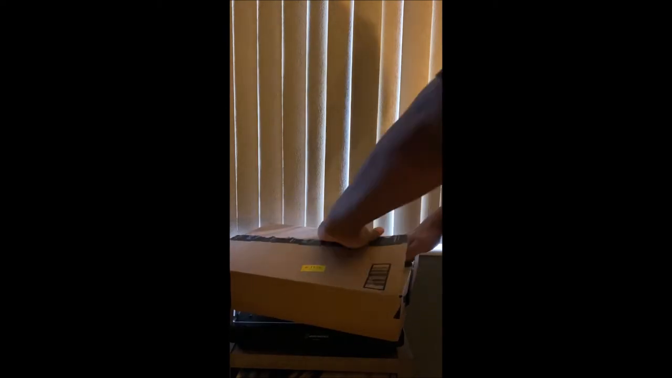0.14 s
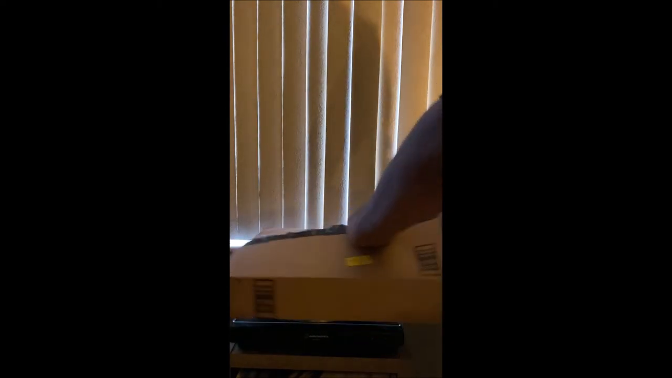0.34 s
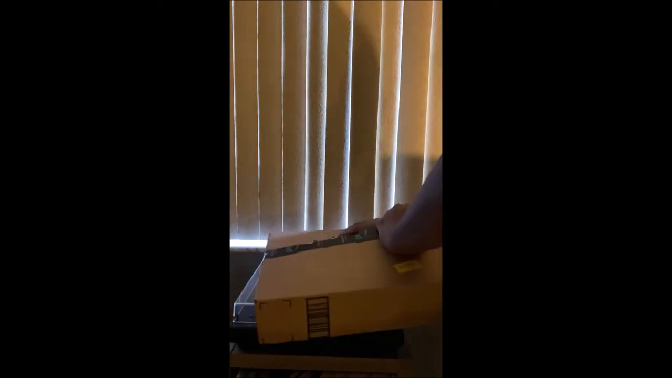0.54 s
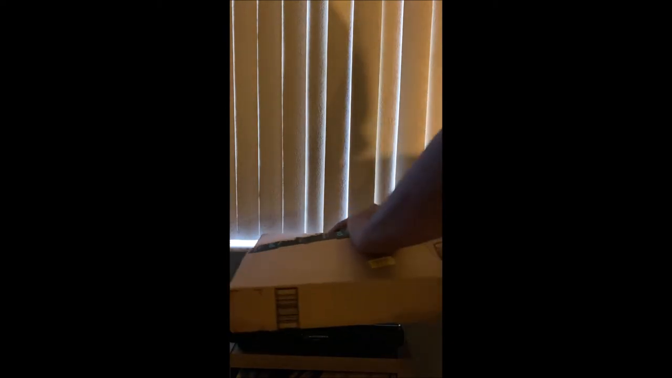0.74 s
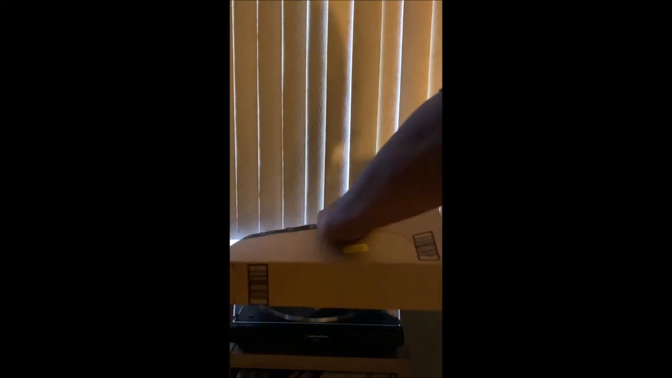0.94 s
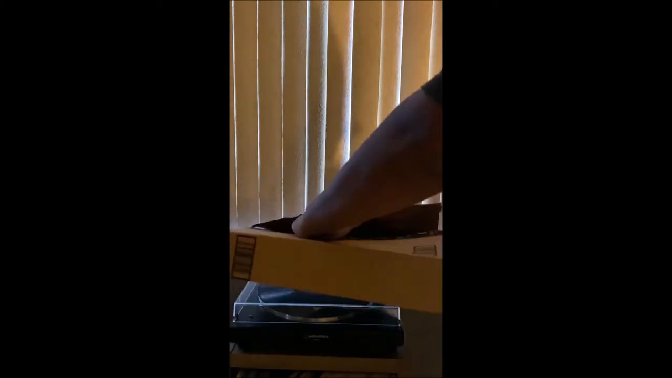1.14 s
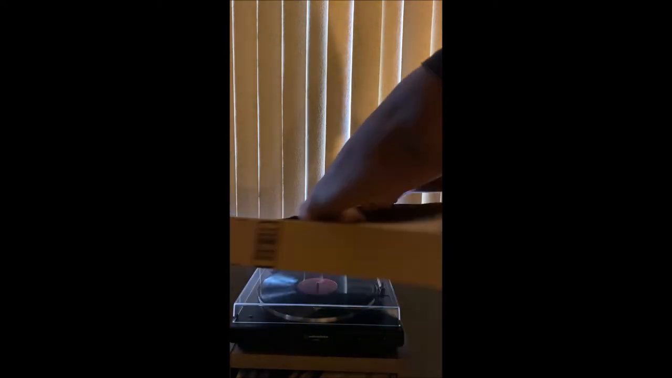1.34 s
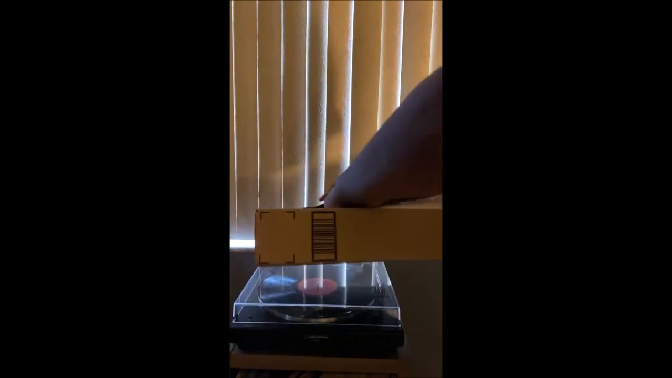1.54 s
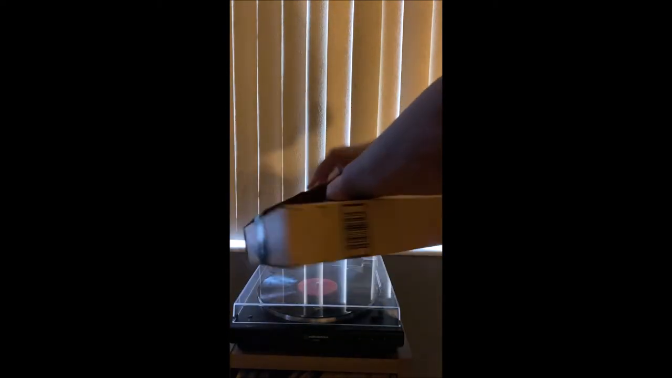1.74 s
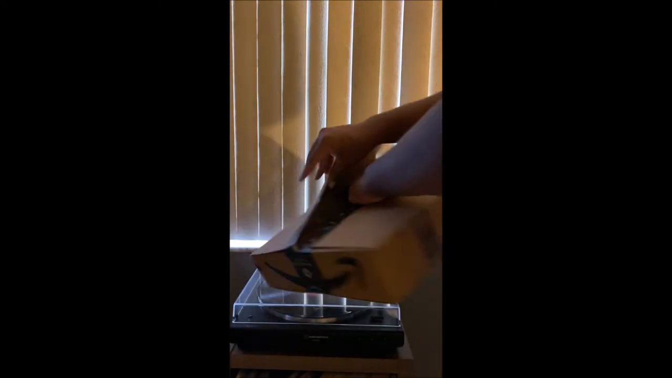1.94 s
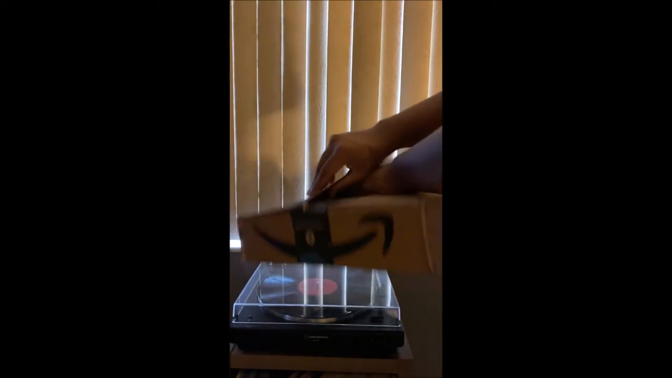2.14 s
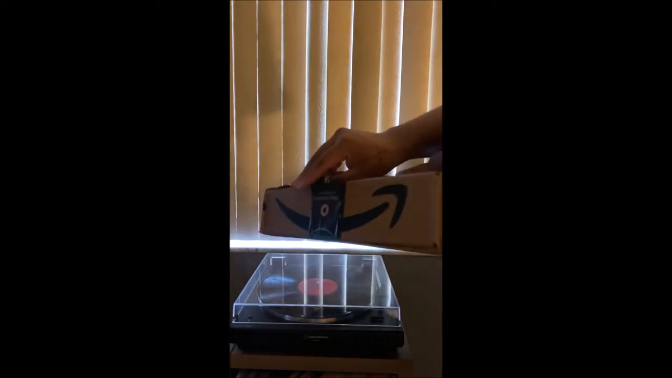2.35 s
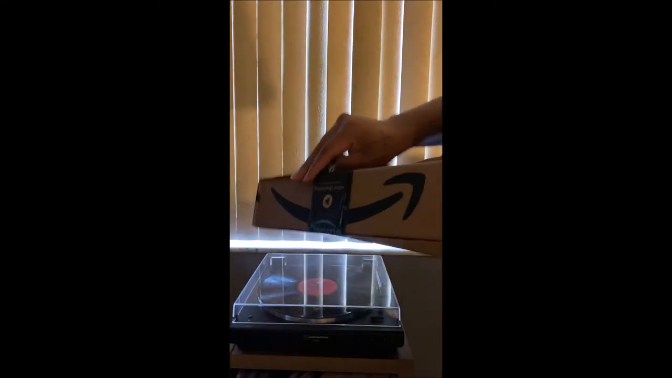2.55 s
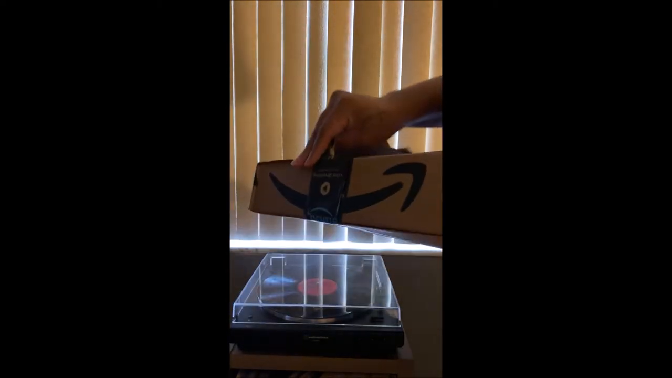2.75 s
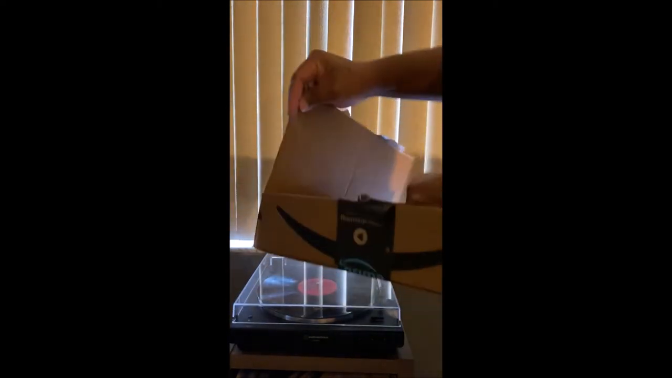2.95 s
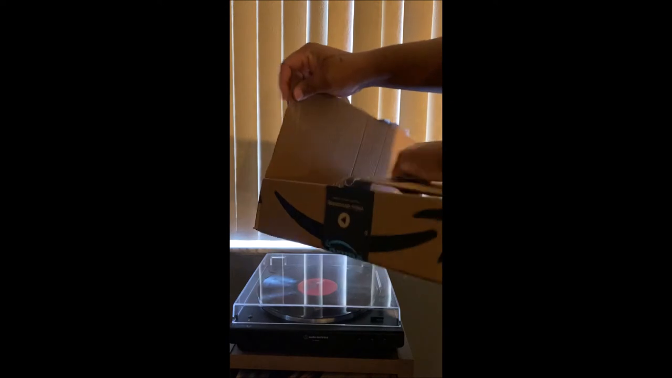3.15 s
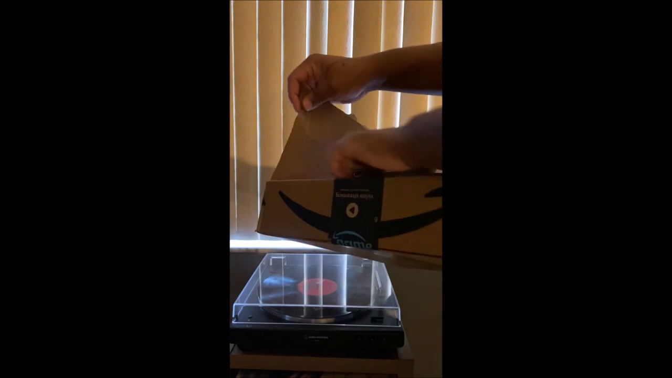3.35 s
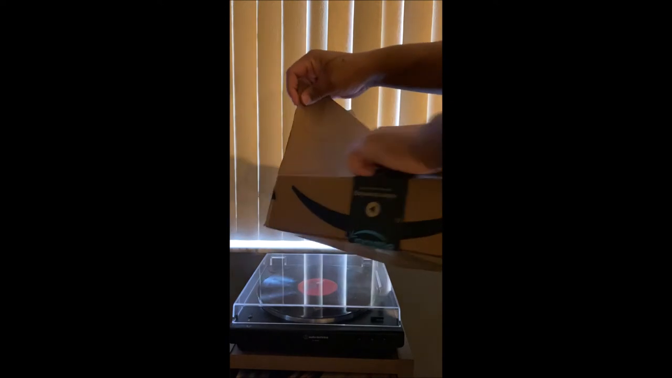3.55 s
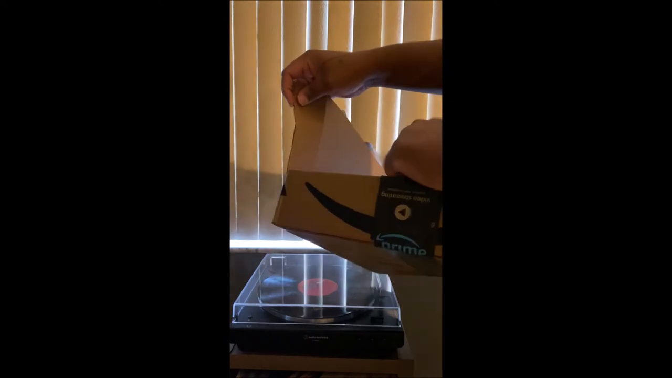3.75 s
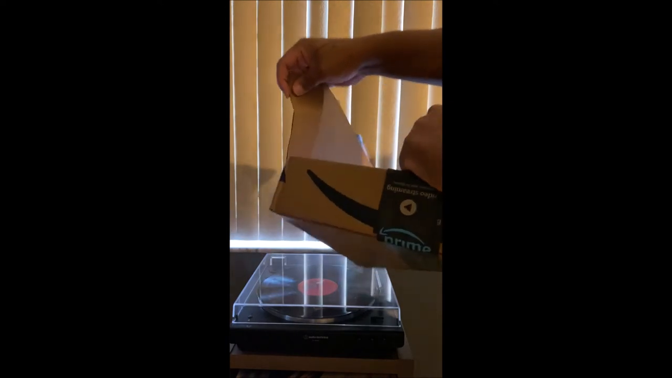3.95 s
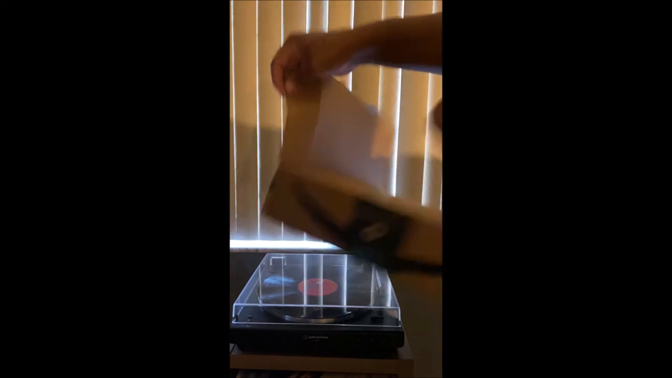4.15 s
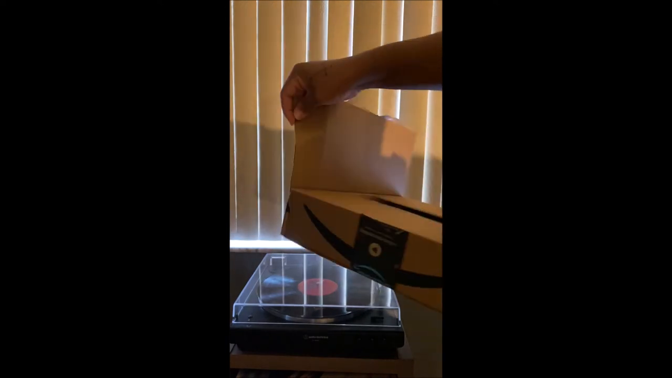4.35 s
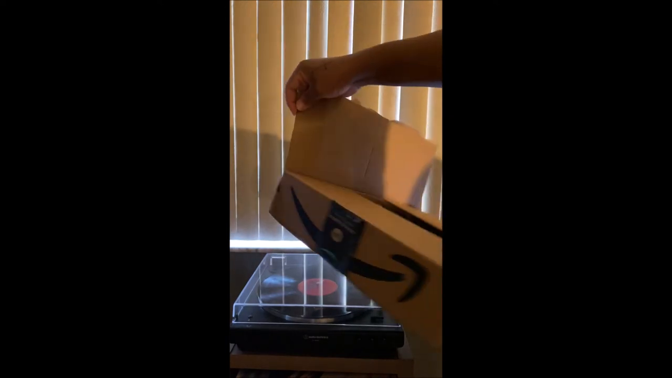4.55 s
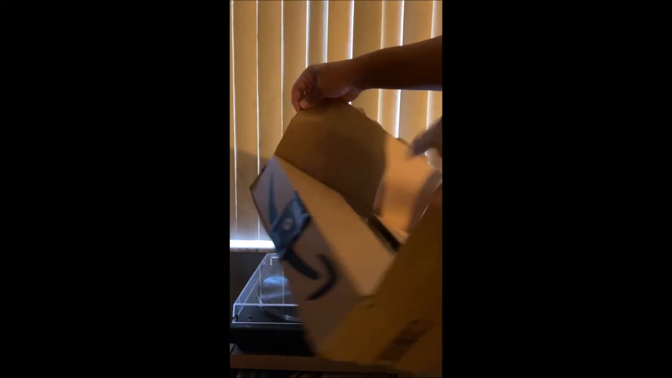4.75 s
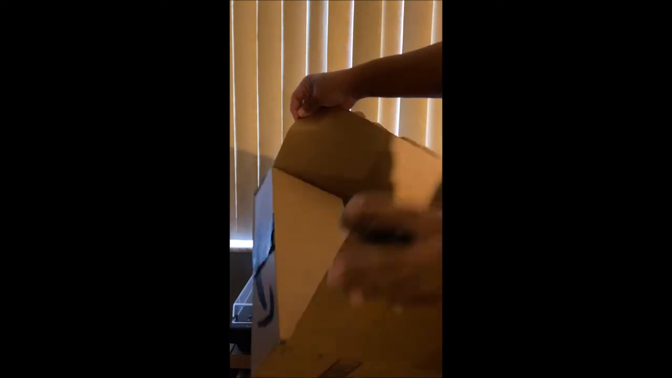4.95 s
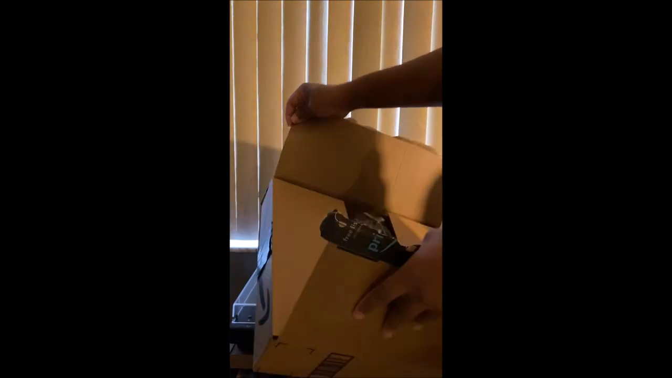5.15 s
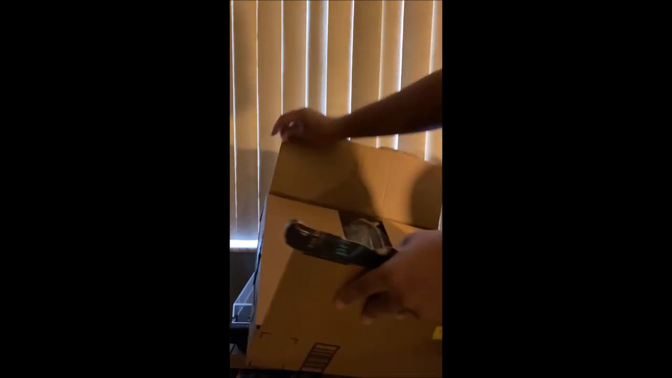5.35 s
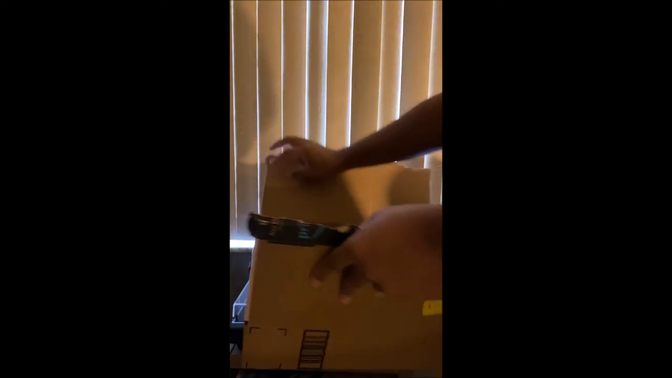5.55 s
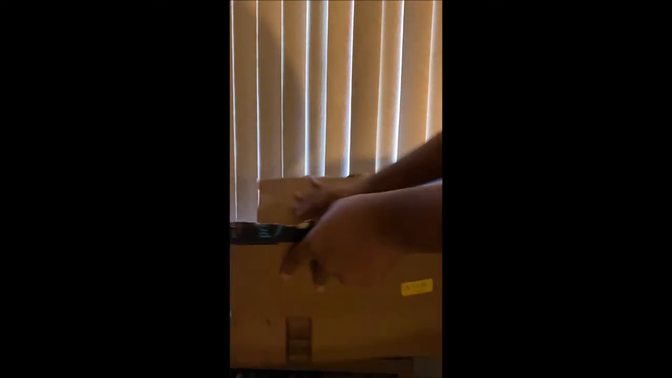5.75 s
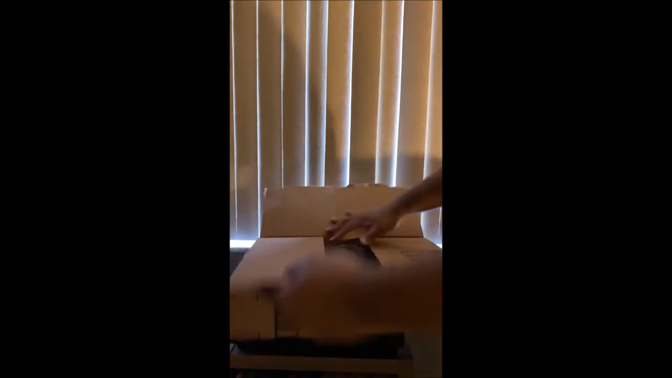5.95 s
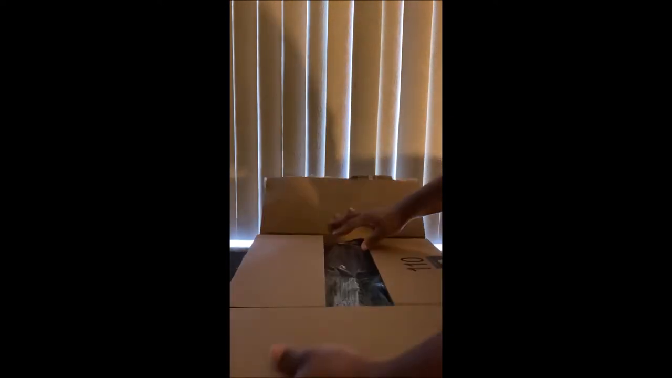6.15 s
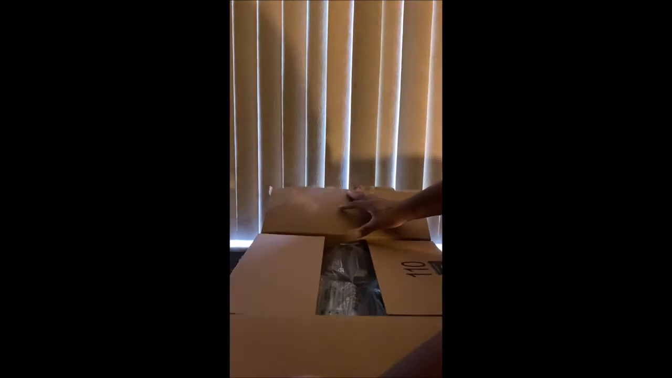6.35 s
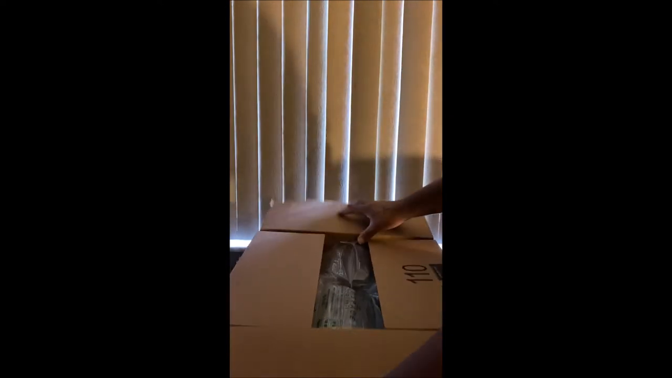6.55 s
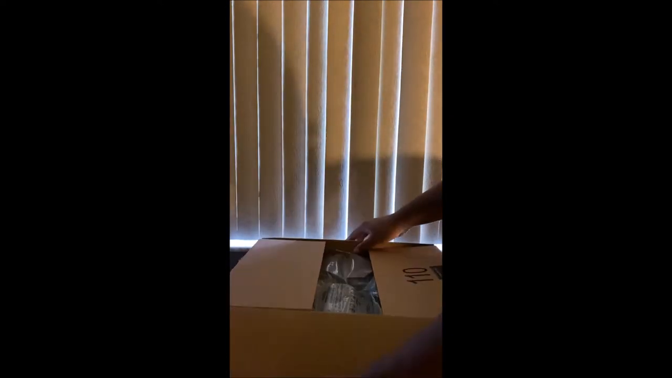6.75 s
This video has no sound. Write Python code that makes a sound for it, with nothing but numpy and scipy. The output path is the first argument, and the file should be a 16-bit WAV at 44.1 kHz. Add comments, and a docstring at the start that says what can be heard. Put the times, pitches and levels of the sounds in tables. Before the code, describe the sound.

A quiet, low room hum sits under close, dry cardboard handling. From 0 to 1.3 s hands brush and rasp over card, with soft hollow palm bumps near 0.5, 0.75 and 1.2 s and a brief scrape. A hard, loud clack with a boxy thump lands at 1.37 s, then lighter sliding, clicks and muffled bumps continue to 2.5 s. At 2.75 and 2.9 s flaps tear with sharp cracks, crunching fluting and hollow booms, plus a weaker snap just before 3 s. Rustling and small clicks follow. Another crunchy snap comes at 3.84 s, a brighter one at 4.17 s, and a deep boxy knock at 4.38 s. Scrapes and a woody clack occur around 4.9-5.05 s, bumps and a scrape near 5.8 s, then softer papery sliding, light taps and a final bump near 6.83 s. Room reflections are short.

```python
"""Cardboard box pulled open

A cardboard shipping box is turned in the hands and opened in a small room, over a low hum.
Noise friction makes the sliding; damped sines and noise bursts make clicks, bumps and knocks.
Five snaps tear flaps loose: crack, fluting crunch, panel clack, flap ring and the boom of box modes.
Two closely spaced microphone ports pick it up, differing in phase and sensitivity."""
import sys
import numpy as np
from scipy import signal
from scipy.fft import rfft, irfft, next_fast_len
from scipy.io import wavfile
from scipy.ndimage import uniform_filter1d

SR = 44100
rng = np.random.default_rng(int(sys.argv[2]) if len(sys.argv) > 2 else 0)


def inscribe(sig):
    """Save sig as 16-bit PCM at rate SR to the path in sys.argv[1].

    A 1-D sig is mono; a 2-D sig holds one channel per row.
    Samples are clipped to [-1, 1] before scaling.
    """
    pcm = np.round(np.clip(np.atleast_2d(sig).T, -1, 1) * 32767)
    wavfile.write(sys.argv[1], SR, pcm.astype(np.int16))


N = 304113
AGE_S = np.arange(SR // 4) / SR   # time since a contact

# Table levels are relative; the functions add fixed trims.
# room hum spectrum: (frequency [Hz], density [dB per Hz])
HUM_SPECTRUM = [(20, -3.5), (36, -43), (48, 6), (58, 11), (72, -6.5), (115, -2.5), (160, -3), (400, -20),
                (1500, -38.5), (15000, -62)]
HUM_DB = -43.5   # rms
# left-right likeness of diffuse sound: (frequency [Hz], correlation [-1..1])
LIKENESS = [(150, .984), (300, .8), (600, .4), (1500, .3), (3500, .35), (7000, .8), (14000, .9)]
# nearby surfaces: (delay [s], level [dB], left over right [dB])
ECHOES = [(.0058, -18, -5), (.0108, -19, 5), (.0155, -15, 4), (.0231, -19, -5)]
# room tail spectrum: (frequency [Hz], level [dB])
TAIL_SPECTRUM = [(80, 1.5), (300, -12), (700, -3), (1200, -4), (2200, 0), (5000, 0), (10000, -5),
                 (16000, -8)]
# tail band edges: (frequency [Hz])
TAIL_EDGES_HZ = [900, 1120, 1420, 1800, 2300, 3000, 4100, 5600, 8000, 12000, 17000]
ROOM_T60_S = 0.24
# phase lag of the right port behind the left: (frequency [Hz], lag [rad])
PORT_PHASE = [(0, 0), (150, -.05), (350, -.25), (700, -.55), (1200, -.35), (1800, 0), (3000, .9),
              (4400, .8), (5000, .15), (7300, 3.14), (10400, 6.28), (13500, 9.42), (16500, 12.4)]
# sensitivity of the left port over the right: (frequency [Hz], level [dB])
PORT_BALANCE = [(200, .1), (1000, -.8), (2300, -1.2), (6000, 0)]
CUTOFF_HZ = 16200

# wall rumble under sliding: (frequency [Hz], density [dB per Hz])
RUMBLE_SPECTRUM = [(40, -10), (100, 5.5), (200, -1), (330, 5), (500, 2.5), (800, -8), (1400, -47),
                   (3000, -65)]
# grainy rasp: (frequency [Hz], density [dB per Hz])
RASP_SPECTRUM = [(300, -9), (700, 8.5), (1200, 5.5), (2000, 3.5), (3200, -1), (4200, -1), (5600, 0),
                 (7000, -13.5), (12000, -3.5)]
# paper-face hiss: (frequency [Hz], density [dB per Hz])
HISS_SPECTRUM = [(1500, -1.5), (4000, 0), (5700, -3), (8000, -3.5), (10000, 2.5), (12500, 4), (15600, 2.5),
                 (16200, -27)]
# hand strokes over card: (start [s], length [s], rasp level [dB], hiss over rasp [dB])
STROKES = [(0.028, 0.15, -58.5, 12.5), (0.214, 0.15, -48, -4), (0.36, 0.33, -52, 4.5),
           (0.69, 0.14, -42.5, -9), (0.792, 0.22, -46, 0), (0.991, 0.25, -46.5, 2.5), (1.237, 0.24, -44, 1),
           (1.422, 0.25, -50.5, 2.5), (1.734, 0.14, -49.5, 0), (2.05, 0.26, -60.5, 19.5),
           (2.197, 0.24, -48.5, 13), (2.492, 0.74, -49.5, -10), (2.857, 0.15, -38.5, -3),
           (3.064, 0.014, -47, 13), (3.177, 0.14, -49, 5.5), (3.252, 0.32, -46, 0.5), (3.54, 0.2, -48, 2.5),
           (3.713, 0.32, -51, -7), (4.093, 0.3, -41, -23), (4.568, 0.12, -66, 17),
           (4.684, 0.43, -44.5, -7.5), (5.16, 0.11, -52.5, 6.5), (5.258, 0.21, -49.5, -3),
           (5.39, 0.37, -47, 0.5), (5.607, 0.62, -50.5, 3), (6.202, 0.28, -54, 12.5),
           (6.6, 0.1, -50.5, -13), (6.74, 0.17, -45.5, -13)]
SPEED_POWER = 0.74   # friction amplitude against hand speed
HISS_SPEED_POWER = 0.63   # extra power of speed for hiss
WALL_RUMBLE_DB = 1   # against the rasp gain
# firmness of the holding hand: (time [s], level [dB])
HOLD = [(0, -16), (.035, -17), (.07, -2), (6.1, -1.5), (6.53, -7.5), (6.7, 0)]
CREEP_RUMBLE_DB, CREEP_RASP_DB, CREEP_HISS_DB = -48.5, -51.5, -53.5   # gains at a 0 dB hold
CRACKLE_DB, CRACKLES_PER_S = -14, 120   # catching fibres against the rasp

# an edge scrapes over card: (start [s], length [s], level [dB], pitch [Hz])
SCRAPES = [(0.052, 0.13, -50, 1770), (0.526, 0.04, -47, 2600), (.746, 0.031, -37.5, 1110),
           (1.748, 0.05, -53, 1820), (3.331, 0.054, -45, 1250), (3.403, .035, -42.5, 1260),
           (3.608, 0.039, -45, 2170), (4.888, 0.034, -46, 2080), (4.935, .04, -44, 1950),
           (5.77, 0.045, -39.5, 1500), (5.866, 0.06, -50.5, 1180), (5.916, 0.28, -51, 4770),
           (6.606, 0.12, -49, 950), (6.804, .05, -42, 1140), (2.882, 0.016, -31, 2400),
           (4.159, 0.031, -32, 1400), (5.001, 0.024, -44, 2000)]
# short pitched card clicks, alone or within knocks and snaps: (time [s], level [dB], pitch [Hz])
CLICKS = [(0.209, -42, 1250), (0.276, -46, 1900), (.478, -42, 1900), (1.199, -35, 1090),
          (1.3727, -13.5, 1250), (1.376, -28, 2300), (1.386, -19, 970), (1.399, -26, 1970),
          (1.567, -41, 1390), (1.788, -35, 1690), (2.1, -30, 1950), (2.263, -29.5, 2220), (2.27, -33, 1350),
          (2.747, -18, 1520), (3.068, -29.5, 1820), (3.248, -32, 2210), (3.267, -31, 1180),
          (3.332, -31, 1280), (3.362, -37, 2040), (3.411, -40, 1150), (3.428, -39, 1440), (3.481, -31, 686),
          (3.748, -33, 1990), (3.8364, -12.5, 1660), (3.847, -32, 1580), (3.861, -28, 2450),
          (4.184, -27, 1430), (4.202, -23, 2050), (4.376, -21, 1190), (5.233, -25.5, 1300),
          (5.591, -28.5, 950), (5.594, -31, 1890), (5.65, -31, 1300), (6.154, -35.5, 1220),
          (6.222, -36, 1220), (6.838, -36, 1900)]
CLICK_Q, CLICK_PEAK_S = 5.7, 0.0026
# single fibres break under the pull: (time [s], level [dB])
TICKS = [(0.7052, -18.5), (0.926, -30), (2.0365, -42), (2.515, -53), (2.562, -40), (2.8664, -43),
         (3.942, -32), (4.025, -36), (4.1114, -35), (4.166, -23), (4.183, -18), (4.2982, -45), (4.862, -37),
         (4.924, -37)]
# the whole box sways in the grip: (time [s], level [dB], pitch [Hz])
SWAYS = [(0.353, -35, 56.8), (1.375, -24.5, 107), (2.903, -24, 93), (3.225, -33, 66), (3.443, -38, 74),
         (4.185, -29, 94.5), (4.873, -28, 84.5), (5.87, -28.5, 113), (6.863, -32, 63)]

# a soft palm bumps a wall: (time [s], wall thump [dB], wall pitch [Hz], panel clack [dB])
BUMPS = [(0.472, -21.5, 228, -58), (0.487, -38, 231, -58), (0.504, -30, 250, -58),
         (.751, -17.5, 294, -24.5), (.766, -22.5, 242, -38), (0.782, -23.5, 195, -56),
         (.797, -27, 225, -53), (1.168, -23.5, 313, -33), (1.676, -29, 316, -37), (1.8392, -30, 320, -33.5),
         (1.95, -33.5, 323, -40), (2.112, -34.5, 207, -40), (2.515, -26.5, 192, -28.5),
         (3.183, -33, 370, -55), (3.25, -30, 400, -51), (3.304, -26, 207, -24), (4.265, -22, 300, -30),
         (4.88, -27.5, 235, -52), (5.245, -30.5, 157, -56), (5.265, -34.5, 158, -52),
         (5.7742, -16, 257, -21), (5.813, -25, 222, -48), (6.077, -30.5, 261, -41), (6.831, -28, 273, -27),
         (6.868, -33.5, 310, -47)]
BUMP_CYCLES, BUMP_PANEL_HZ = 0.55, 639.5
BUMP_TICK_DB = -17   # tick setting against clack setting
# hard flap edge or fingertip knocks card: (time [s], wall thump [dB], wall pitch [Hz],
# wall rise [cycles], panel clack [dB], panel pitch [Hz], flap ring [dB], flap pitch [Hz], tick [dB])
KNOCKS = [(.706, -42, 288, 0.78, -38, 606, -37, 890, -40), (1.3725, -9, 330, 1, -3.5, 658, -17, 936, -25),
          (1.569, -32, 263, 0.84, -32, 1160, -44, 1138, -47),
          (2.762, -12.5, 279, 0.8, -19, 1080, -25, 1900, -24),
          (2.774, -22, 272, 0.87, -25, 1120, -36, 2600, -24),
          (2.805, -23.5, 276, 0.65, -30, 1070, -42, 1130, -43),
          (2.951, -21, 310, 0.35, -15.5, 634, -43, 750, -42),
          (3.748, -27, 330, 0.76, -29.5, 617, -51, 1900, -31),
          (4.3792, -5.5, 346, 0.61, -26, 770, -27.5, 1253, -31),
          (4.396, -23, 424, 0.84, -19, 1240, -31.5, 1317, -32),
          (4.861, -27, 414, 0.64, -20, 620, -42, 830, -48),
          (5.0402, -25.5, 404, 0.39, -10, 1300, -43, 1303, -26.5),
          (5.864, -18, 220, 0.6, -25, 562, -41, 1220, -52),
          (6.805, -36.5, 260, 0.5, -27, 896, -48, 1140, -54)]
KNOCK_RATTLE_DB = -29.5   # fluting rattle against clack setting
WALL_CHATTER_DB, PANEL_CHATTER_DB = -15.5, -23.0   # card on card, at a 0 dB blow
CHATTER_PER_DB = -0.04   # light blows chatter relatively more

# a flap tears loose: (time [s], crunch [dB], crunch pitch [Hz], wall thump [dB], wall pitch [Hz],
# wall rise [cycles], panel clack [dB], panel pitch [Hz], flap ring [dB], flap pitch [Hz], crack [dB])
SNAPS = [(2.7454, -10, 2360, -10, 306, 0.93, -2, 541, -16, 1107, -20.5),
         (2.892, -13, 1750, -13, 305, 0.9, -0.5, 594, -21, 739, -16),
         (2.9753, -24.5, 2600, -33, 225, 0.57, -20.5, 620, -37, 1120, -21.5),
         (3.8366, -12.5, 1590, -11, 343, 0.65, -16, 527, -22, 586, -19),
         (4.1728, -11, 4600, -13.5, 347, 0.77, -2, 522, -31, 590, -30)]
# hollow box modes: (frequency [Hz], level [dB], T60 [s])
BOX_MODES = [(94, -7, 0.084), (173.8, -14.5, 0.18), (207, -15.5, 0.14), (250, -15.5, 0.19),
             (270, -13, 0.22), (335, -12, 0.19), (375, -35, 0.18), (429, -13, 0.11), (590, -16, 0.2)]
MODE_FALL_DB_PER_OCT = 8   # with distance of a mode from the wall pitch
WALL_SAG = 0.3   # share by which a thump falls in pitch
# card panel modes: (multiple of pitch, level [dB], rise [cycles])
PANEL_MODES = [(1, 0, 1.4), (.89, -13, 3), (1.08, -19, 6), (1.36, -12, 2), (1.58, -15, 2), (2.3, -19, 3)]
# free flap modes: (multiple of pitch, level [dB], T60 [s])
FLAP_MODES = [(1, -6, 0.14), (.81, -11, .11), (.89, -6, .14), (.95, -8, .11), (1.12, -9, .12)]
# modes of the fluting inside the card: (frequency [Hz], level [dB], T60 [s])
FLUTING_MODES = [(1130, -5, 0.41), (1637, -1, 0.071), (1900, 8, 0.085), (2120, 0, 0.093), (2400, -19, .16),
                 (2600, -3.5, 0.21), (3240, -17, 0.075), (3950, -2, 0.18), (5030, 2.5, 0.12)]
FLUTING_DETUNE = 0.0376   # relative pitch spread as card bends
FLUTING_RING_DB = -17.5
RATTLE_DB, RATTLE_PEAK_S, RATTLE_PER_S = -16.0, 0.0088, 350


def from_db(db):
    """Decibels to amplitude gain."""
    return 10 ** (np.asarray(db) / 20)


def rms_one(x):
    """Scale to unit rms."""
    return x / np.sqrt(np.mean(x ** 2) + 1e-20)


def at_hz(points, hz):
    """Interpolate a table on a log-frequency axis."""
    f, value = np.transpose(points)
    return np.interp(np.log(hz + 1), np.log(f), value)


def band(x, low_hz, high_hz, order=2):
    """Causal Butterworth band-pass."""
    edges_hz = [low_hz, min(high_hz, .45 * SR)]
    return signal.sosfilt(signal.butter(order, edges_hz, "band", fs=SR, output="sos"), x)


def resonate(x, hz, q):
    """One broad resonance of the card."""
    b, a = signal.iirpeak(min(hz, .4 * SR), max(q, .8), fs=SR)
    return signal.lfilter(b, a, x + 1e-18)


def add(out, s, sound):
    """Mix a sound in at a time in seconds."""
    start = round(s * SR)
    out[start:start + len(sound)] += sound[:N - start]


def stereo_noise(spectrum, size, grain_db=0):
    """Coloured noise with frequency-dependent left-right correlation and optional uneven grains."""
    fft_size = next_fast_len(size)
    hz = np.fft.rfftfreq(fft_size, 1 / SR)
    unevenness = rms_one(uniform_filter1d(rng.standard_normal(size), size=40))
    grains = from_db(grain_db * unevenness)
    mid, side = rfft(rng.standard_normal((2, size)) * grains, fft_size)
    alike = np.clip(at_hz(LIKENESS, hz), 0, 1)
    pair = np.sqrt((1 + alike) / 2) * mid + np.sqrt((1 - alike) / 2) * side * [[1], [-1]]
    return irfft(pair * from_db(at_hz(spectrum, hz)), fft_size)[:, :size]


def flutter(per_s, depth_db):
    """Gain wandering between random points."""
    points = rng.standard_normal(4096)
    return from_db(depth_db * np.interp(np.arange(N) / SR * per_s, np.arange(4096), points))


def swell(peak_s):
    """Envelope that rises to 1 and dies away."""
    return AGE_S / peak_s * np.exp(1 - AGE_S / peak_s)


def flex(hz, cycles):
    """Heavily damped sheet: a sine whose envelope peaks after some cycles."""
    return swell(cycles / hz) * np.sin(2 * np.pi * hz * AGE_S)


def fibres(low_hz, high_hz, peak_s):
    """Fibres crushing or breaking: a short band-noise burst."""
    return rms_one(band(rng.standard_normal(len(AGE_S)), low_hz, high_hz)) * swell(peak_s)


def crackle(size, per_s, spread_db):
    """Random slips of very unequal strength; rms 1."""
    slips = rng.random(size) < per_s / SR
    unevenness = np.minimum(rng.exponential(1, size), 4)
    return rms_one(slips * rng.standard_normal(size) * from_db(spread_db * unevenness))


def ringing(hz, db, t60_s):
    """Exponentially decaying sine modes, with strengths varied at random on each blow."""
    strength = from_db(db + rng.normal(0, 1, hz.shape) - 60 * AGE_S / t60_s)
    return np.sum(strength * np.sin(2 * np.pi * hz * AGE_S), axis=0)


def hum():
    """Steady low room noise."""
    return from_db(HUM_DB) * rms_one(stereo_noise(HUM_SPECTRUM, size=N))


def room(x):
    """Direct sound, dull close reflections, a noise-like response and a diffuse upper tail."""
    age_s = np.arange(SR // 2) / SR
    envelope = from_db(-60 * age_s / ROOM_T60_S) * (1 - np.exp(-(age_s / 0.00099) ** 2))
    envelope /= np.sqrt(np.sum(envelope ** 2))
    noise = stereo_noise(TAIL_SPECTRUM, size=len(age_s)) * envelope
    response = band(noise, 55, TAIL_EDGES_HZ[0], order=3) + .5 * band(noise, 1950, 3500)
    for delay_s, db, pan_db in ECHOES:
        impulse = np.arange(len(age_s)) == round(delay_s * SR)
        gains = from_db([[db + pan_db / 2], [db - pan_db / 2]])
        response += gains * band(impulse, 130, 510, order=1)
    response[:, 0] += 1   # direct sound
    out = signal.fftconvolve(x[None], response, axes=1)[:, :N]
    diffuse = stereo_noise([(20, 0), (20000, 0)], size=N, grain_db=2.2)
    for low_hz, high_hz in zip(TAIL_EDGES_HZ, TAIL_EDGES_HZ[1:]):
        # dense reflections keep only the energy of each band
        energy = signal.fftconvolve(band(x, low_hz, high_hz, order=4) ** 2, envelope ** 2)[:N]
        gain = from_db(at_hz(TAIL_SPECTRUM, np.sqrt(low_hz * high_hz)) - 5)
        out += gain * np.sqrt(np.abs(energy)) * rms_one(band(diffuse, low_hz, high_hz, order=4))
    return out


def friction():
    """Rumble, rasp and hiss gains: strokes speed up and slow down over the creep of the holding hand."""
    rasp_power, hiss_power = np.zeros((2, N))
    for s, length_s, db, hiss_db in STROKES:
        speed = np.abs(np.sin(np.pi * np.arange(0, length_s, 1 / SR) / length_s))
        stroke = from_db(db) * speed ** SPEED_POWER
        hiss_stroke = from_db(hiss_db - 1.0) * stroke * speed ** HISS_SPEED_POWER
        add(rasp_power, s, stroke ** 2)
        add(hiss_power, s, hiss_stroke ** 2)
    hold_db = np.interp(np.arange(N) / SR, *np.transpose(HOLD))
    rasp, hiss = np.sqrt(rasp_power), np.sqrt(hiss_power)
    return (np.hypot(from_db(WALL_RUMBLE_DB) * rasp, from_db(hold_db + CREEP_RUMBLE_DB)),
            np.hypot(rasp, from_db(hold_db + CREEP_RASP_DB)),
            np.hypot(hiss, from_db(hold_db + CREEP_HISS_DB)))


def rasping():
    """Grainy friction whose bands wander separately as the contact moves; rms 1."""
    noise = stereo_noise(RASP_SPECTRUM, size=N, grain_db=-1.5)
    edges_hz = np.geomspace(350, 11000, num=9)
    total = 0
    for k, (low_hz, high_hz) in enumerate(zip(edges_hz, edges_hz[1:])):
        shifted = np.roll(noise, k * SR // 3, axis=1)   # decorrelates the grains of the bands
        total = total + band(shifted, low_hz, high_hz, order=3) * flutter(35, 2.7)
    return rms_one(total)


def catching():
    """Fibres catch and let go, ringing patches of card at six pitches; rms 1."""
    pitches_hz = np.geomspace(900, 2700, num=6)
    per_s = CRACKLES_PER_S / len(pitches_hz)
    return rms_one(sum(resonate(crackle(N, per_s, 0.4), hz, q=4.9) for hz in pitches_hz))


def sliding():
    """Friction: wall rumble, grainy rasp with catching fibres, and paper hiss."""
    rumble_gain, rasp_gain, hiss_gain = friction()
    grip = flutter(90, 1.0)   # the hand catches and slips
    rumble = rumble_gain * flutter(40, 2.7) * rms_one(stereo_noise(RUMBLE_SPECTRUM, size=N))
    rasp = rasp_gain * (rasping() + from_db(CRACKLE_DB) * catching())
    hiss = hiss_gain * rms_one(stereo_noise(HISS_SPECTRUM, size=N))
    return grip * (rumble + rasp + hiss)


def scrapes():
    """Quick slips ring a strip of card while the edge passes."""
    out = np.zeros(N)
    for s, length_s, db, hz in SCRAPES:
        stroke = np.sin(np.pi * np.minimum(AGE_S / length_s, 1))
        strip = rms_one(resonate(crackle(len(AGE_S), 2500, 4.5), hz, q=3.8))
        add(out, s, from_db(db) * stroke * strip)
    return out


def clicks():
    """Short pitched card clicks: resonant noise of a small patch plus a damped sine."""
    out = np.zeros(N)
    for s, db, hz in CLICKS:
        patch = rms_one(resonate(rng.standard_normal(len(AGE_S)), hz, q=CLICK_Q))
        add(out, s, from_db(db) * (0.26 * patch * swell(CLICK_PEAK_S) + 0.49 * flex(hz, cycles=1.0)))
    return out


def crack(decay_s):
    """One sharp break, then a weaker spray: band-passed noise under two envelopes."""
    envelope = np.exp(-AGE_S / decay_s) + 0.09 * swell(2 * decay_s)
    return band(rng.standard_normal(len(AGE_S)) * envelope, 5100, 21000, order=1)


def ticks():
    """Single fibres give way in tiny cracks."""
    out = np.zeros(N)
    for s, db in TICKS:
        add(out, s, from_db(db + 6.5) * crack(0.00039))
    return out


def sways():
    """The whole box swings as one heavily damped low mode."""
    out = np.zeros(N)
    for s, db, hz in SWAYS:
        add(out, s, from_db(db + 3.5) * flex(hz, cycles=0.49))
    return out


def boom(wall_hz, cycles, modes_db):
    """A struck wall flexes, falling in pitch, and wakes mostly the box modes near its own pitch."""
    hz, db, t60_s = np.transpose(BOX_MODES)[:, :, None]
    distance_oct = np.abs(np.log2(hz / wall_hz))
    modes = ringing(hz, db + modes_db - MODE_FALL_DB_PER_OCT * distance_oct, t60_s)
    # bending waves arrive highest first
    pitch_hz = wall_hz * (1 + WALL_SAG * (np.exp(-AGE_S * wall_hz / cycles) - .27))
    wall = swell(cycles / wall_hz) * np.sin(2 * np.pi * np.cumsum(pitch_hz) / SR)
    return wall + modes * (1 - np.exp(-AGE_S / 0.015))


def panel(hz):
    """Hollow clack of a stiff sheet, roughened by its fluting; soft card damps the top."""
    modes = sum(from_db(db) * flex(multiple * hz, cycles) for multiple, db, cycles in PANEL_MODES)
    return band(0.5 * modes + 0.25 * fibres(1060, 1100, 0.0012), 113, 1400, order=4)


def flap(hz):
    """A free flap rings in close, beating modes; its pitch depends on where it is held."""
    multiple, db, t60_s = np.transpose(FLAP_MODES)[:, :, None]
    return ringing(multiple * hz, db, t60_s) * (1 - np.exp(-AGE_S / 0.00057))


def rattle():
    """Loosened fluting ticks unevenly on the liner and rings faintly, retuned at each blow."""
    ticking = rms_one(band(crackle(len(AGE_S), RATTLE_PER_S, 4.6), 600, 4400))
    contacts = ticking * swell(RATTLE_PEAK_S)
    hz, db, t60_s = np.transpose(FLUTING_MODES)[:, :, None]
    bent_hz = hz * (1 + FLUTING_DETUNE * rng.standard_normal(hz.shape))
    modes = ringing(bent_hz, db, t60_s) * (1 - np.exp(-AGE_S / 0.0027))
    return from_db(RATTLE_DB) * contacts + from_db(FLUTING_RING_DB) * modes


def blow(thump_db, wall_hz, cycles, clack_db, panel_hz, tick_db):
    """Tick and panel clack, then a slightly later wall thump, with brief chatter of card on card."""
    strength_db = CHATTER_PER_DB * max(thump_db, clack_db)
    wall_chatter = from_db(WALL_CHATTER_DB + strength_db) * fibres(138, 440, 0.009)
    panel_chatter = from_db(PANEL_CHATTER_DB + strength_db) * fibres(0.96 * panel_hz, 1370, 0.0039)
    thump = boom(wall_hz, cycles, modes_db=-2.0) + wall_chatter
    late_thump = np.interp(AGE_S - 0.00208, AGE_S, thump, left=0)
    clack = panel(panel_hz) + panel_chatter
    tick = fibres(2800, 3100, 0.0011) + 1.1 * fibres(4600, 11200, 0.0012)
    return (from_db(clack_db + 2.5) * clack + from_db(tick_db - 8.0) * tick
            + from_db(thump_db + 2.0) * late_thump)


def bumps():
    """A soft palm thumps a wall and flexes the whole panel."""
    out = np.zeros(N)
    for s, thump_db, wall_hz, clack_db in BUMPS:
        tick_db = clack_db + BUMP_TICK_DB
        add(out, s, blow(thump_db, wall_hz, BUMP_CYCLES, clack_db, BUMP_PANEL_HZ, tick_db))
    return out


def knocks():
    """Hard contacts strike wall and panel, ring a flap and shake the fluting."""
    out = np.zeros(N)
    for s, thump_db, wall_hz, cycles, clack_db, panel_hz, ring_db, ring_hz, tick_db in KNOCKS:
        add(out, s, blow(thump_db, wall_hz, cycles, clack_db, panel_hz, tick_db))
        add(out, s, from_db(ring_db) * flap(ring_hz))
        add(out, s, from_db(clack_db + KNOCK_RATTLE_DB) * rattle())
    return out


def crunch(hz):
    """Fluting collapses: resonant noise, a burst of fibres and a damped sine."""
    noise = rng.standard_normal(len(AGE_S))
    fluting = rms_one(resonate(resonate(noise, hz, q=2.2), hz, q=2.2))
    crushed = fluting * (0.7 * swell(0.0019) + 0.074 * swell(0.0034))
    return crushed + 0.62 * fibres(1400, 6100, 0.0012) + 0.63 * flex(hz, cycles=1.9)


def snaps():
    """Fibres part with a crack, fluting crunches and rattles, the freed flap rings and the box booms."""
    out = np.zeros(N)
    for (s, crunch_db, crunch_hz, thump_db, wall_hz, cycles,
         clack_db, panel_hz, ring_db, ring_hz, crack_db) in SNAPS:
        clack = 0.61 * panel(panel_hz) + 0.19 * fibres(435, 750, 0.0053)
        thump = boom(wall_hz, cycles, modes_db=-2.5) + 0.17 * fibres(205, 486, 0.0058)
        add(out, s, from_db(crunch_db - 6.5) * (crunch(crunch_hz) + rattle()))
        add(out, s, from_db(ring_db) * flap(ring_hz))
        add(out, s + 0.0003, from_db(crack_db + 12.5) * crack(0.0011))
        add(out, s + 0.00034, from_db(clack_db) * clack)
        add(out, s + 0.00343, from_db(thump_db + 6.5) * thump)
    return out


def scene():
    """Contacts excite the room; sliding and hum are added directly in stereo."""
    contacts = scrapes() + clicks() + ticks() + sways() + bumps() + knocks() + snaps()
    return hum() + sliding() + room(contacts)


def record(dry):
    """Two ports differ in phase and sensitivity; peaks are rounded and the top is cut."""
    size = next_fast_len(N + SR // 10)
    hz = np.fft.rfftfreq(size, 1 / SR)
    half = np.array([[.5], [-.5]])   # split the difference over left, right
    phase = np.exp(1j * half * np.interp(hz, *np.transpose(PORT_PHASE)))
    sensitivity = from_db(half * at_hz(PORT_BALANCE, hz))
    ports = irfft(rfft(dry, size) * phase * sensitivity, size)[:, :N]
    rounded = ports / (1 + ports ** 4) ** (1 / 4)
    low_pass = signal.ellip(10, .1, 80, CUTOFF_HZ, fs=SR, output="sos")
    return signal.sosfilt(low_pass, rounded)


dry = scene()
out = record(dry)
inscribe(out)
```